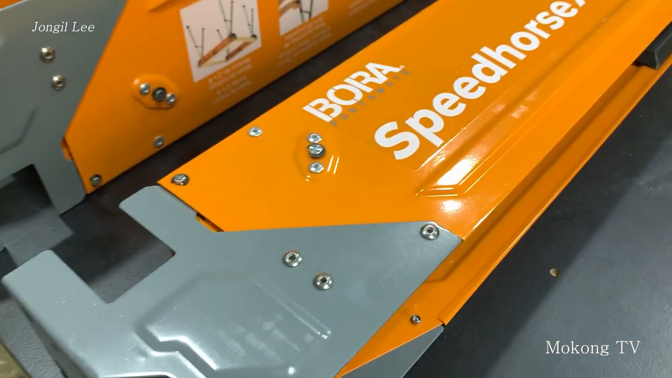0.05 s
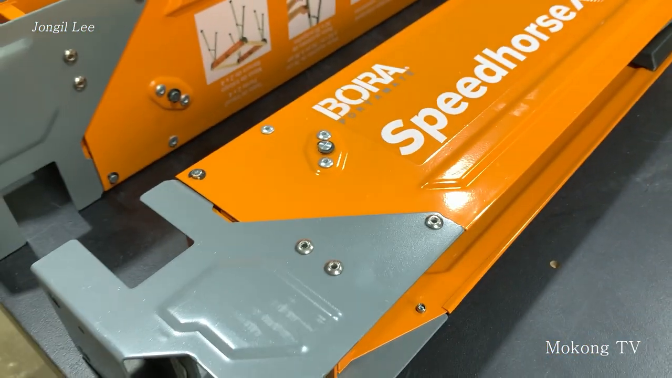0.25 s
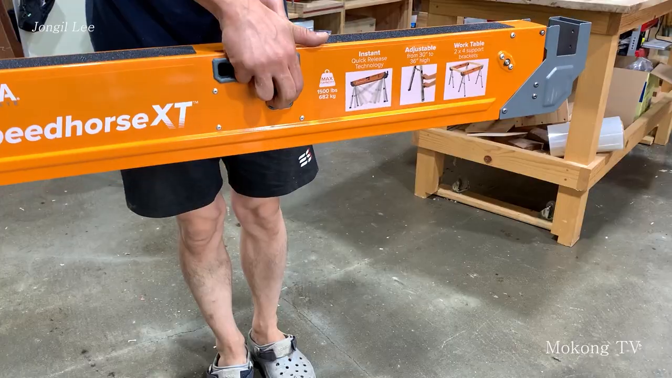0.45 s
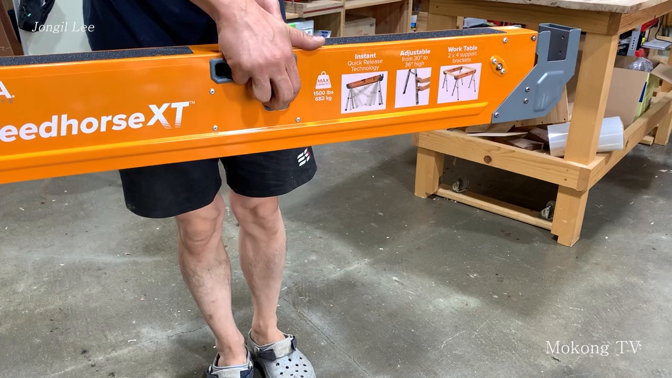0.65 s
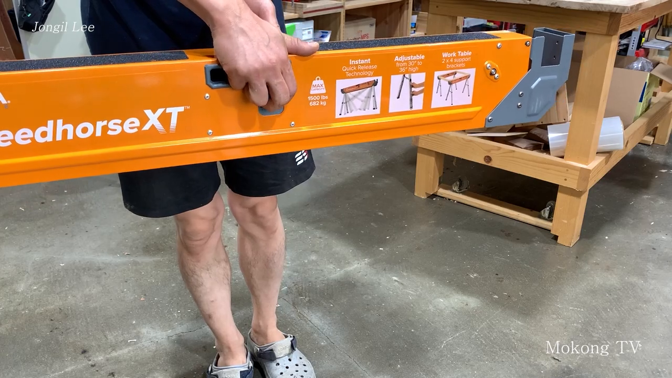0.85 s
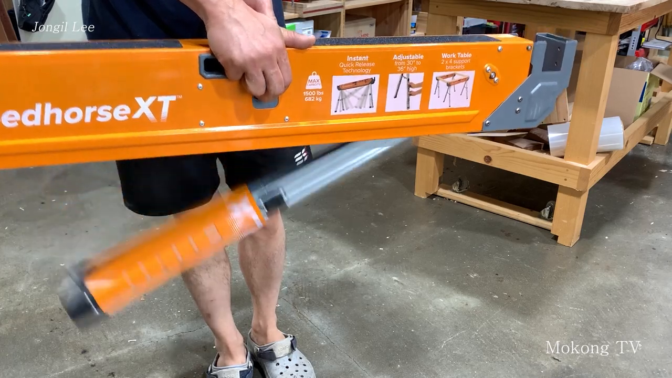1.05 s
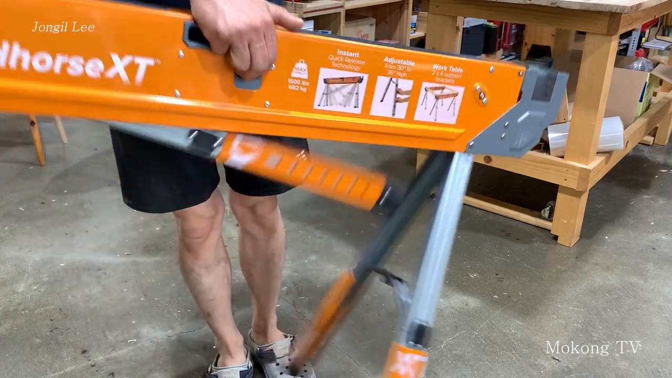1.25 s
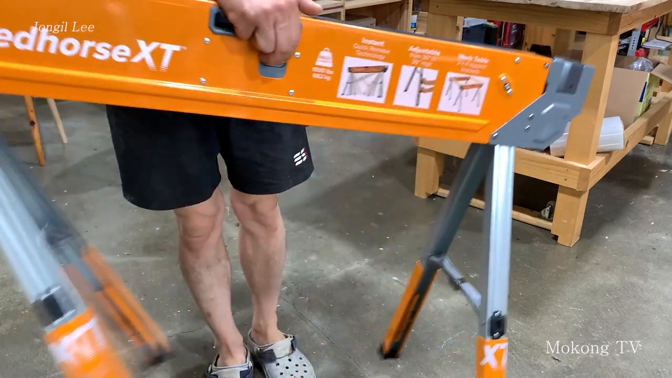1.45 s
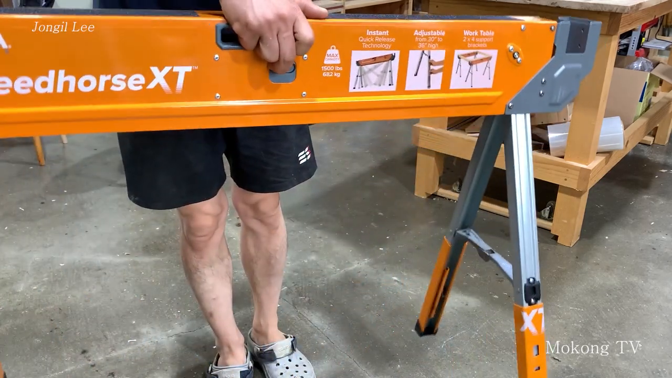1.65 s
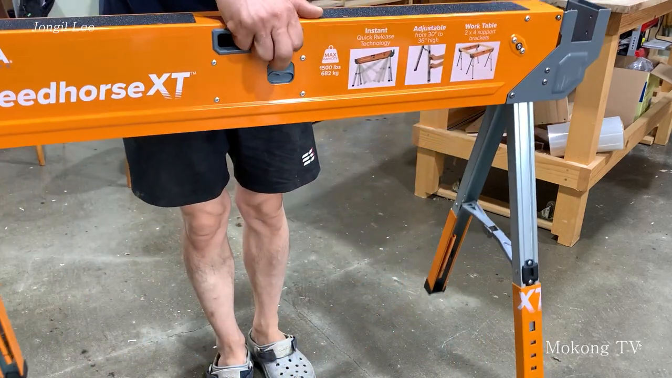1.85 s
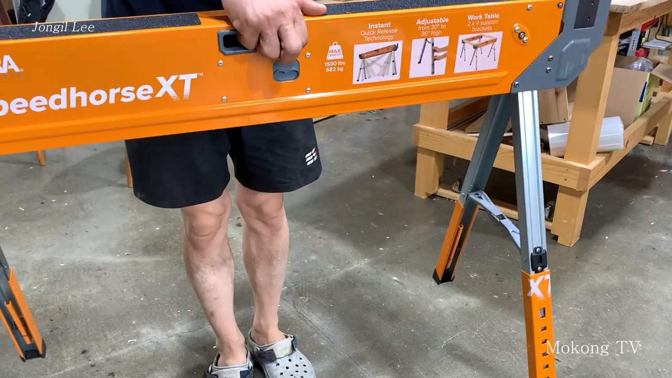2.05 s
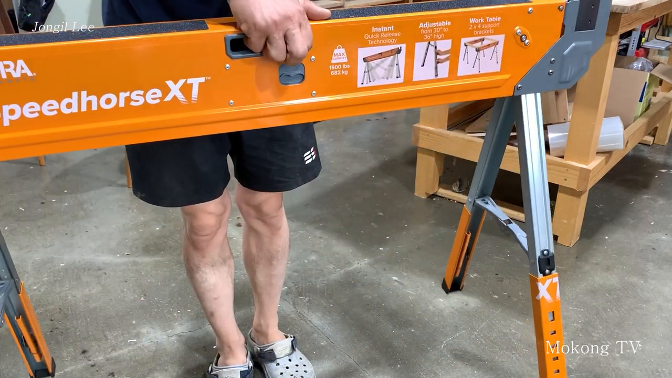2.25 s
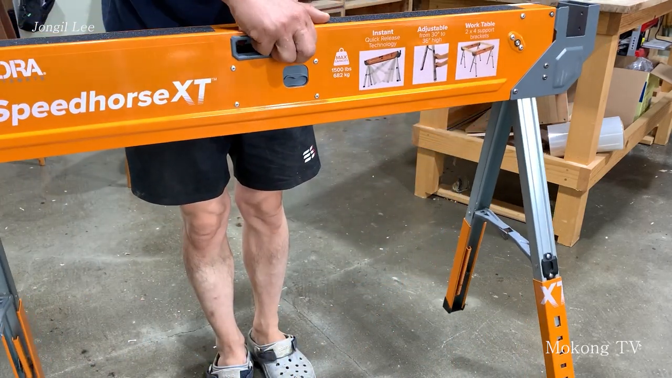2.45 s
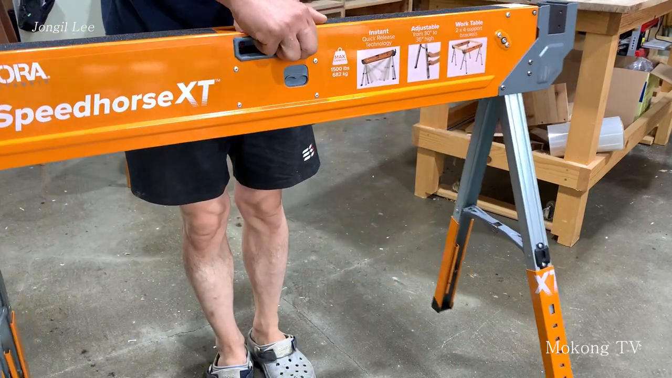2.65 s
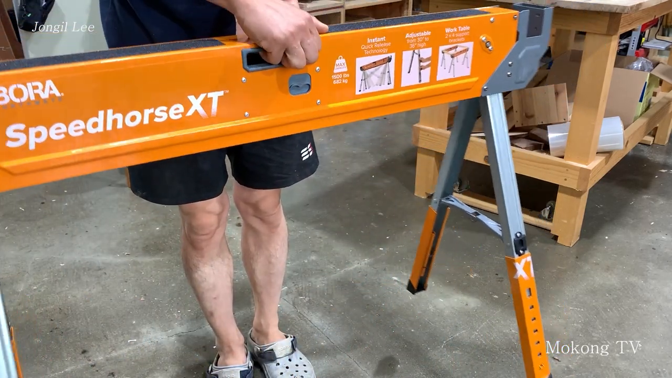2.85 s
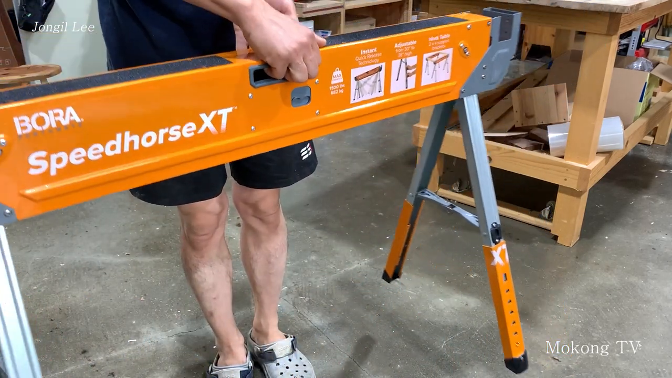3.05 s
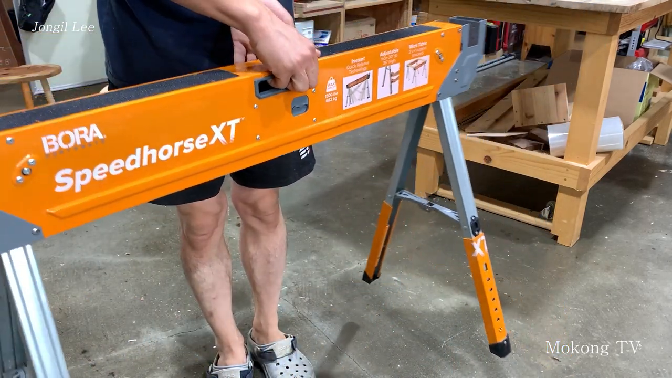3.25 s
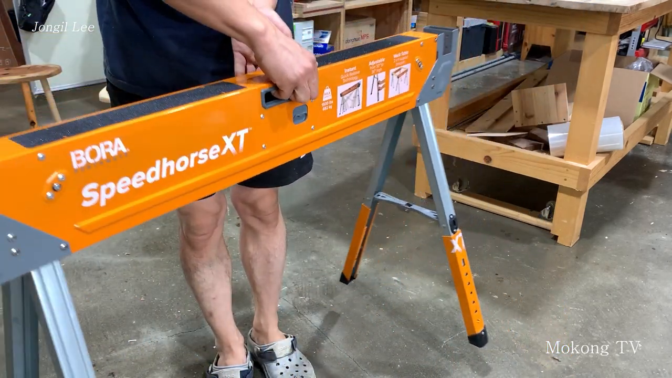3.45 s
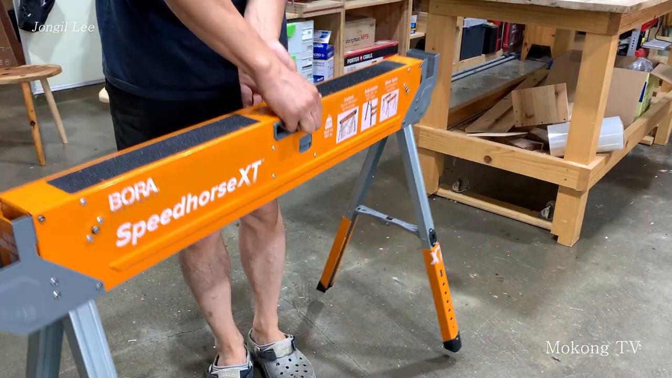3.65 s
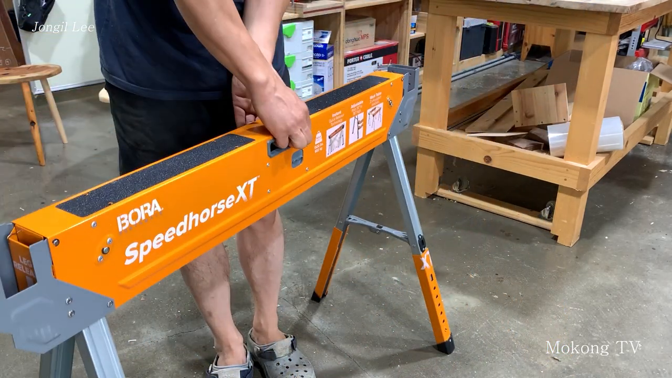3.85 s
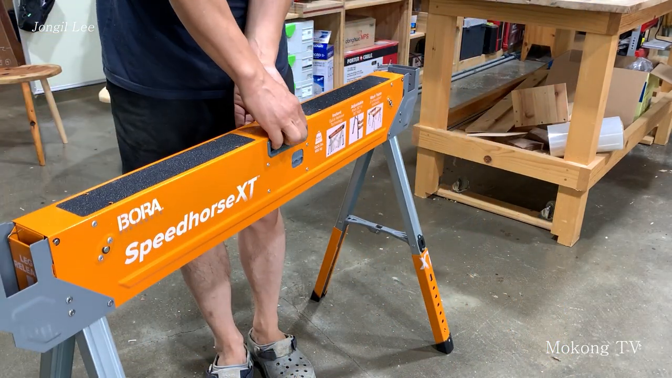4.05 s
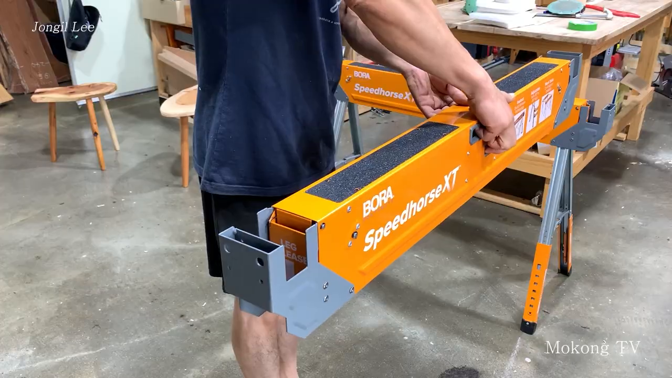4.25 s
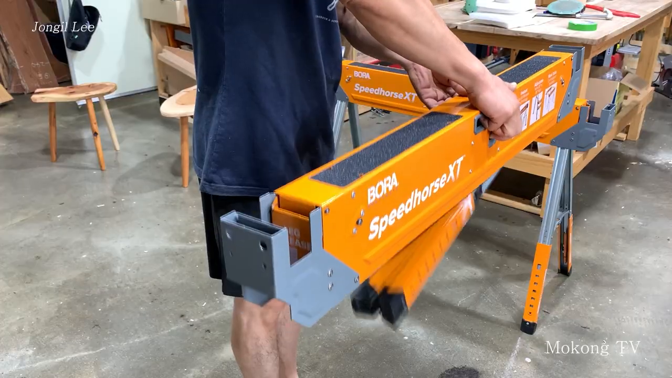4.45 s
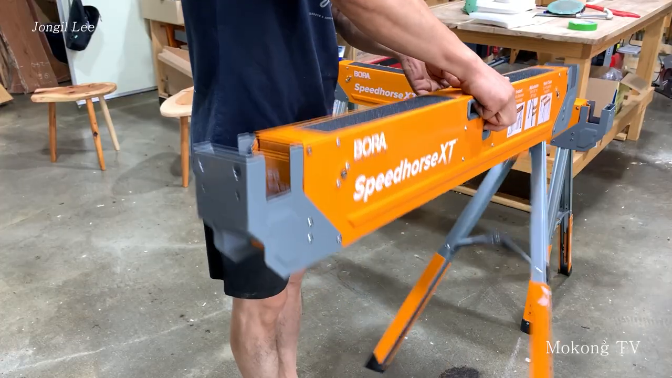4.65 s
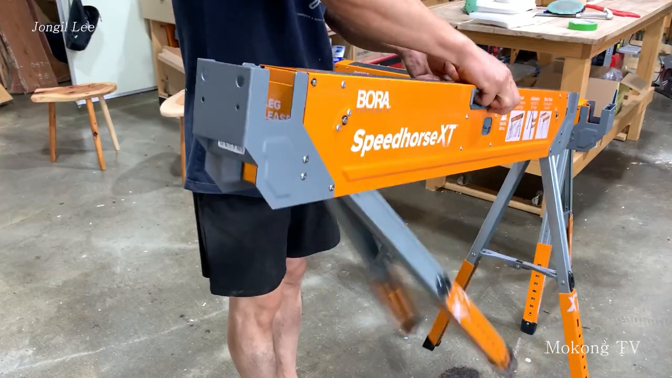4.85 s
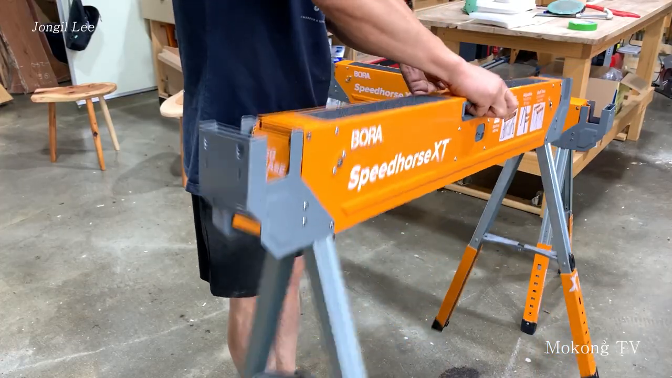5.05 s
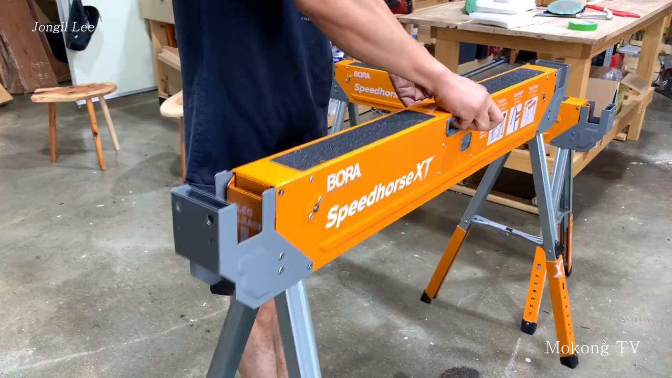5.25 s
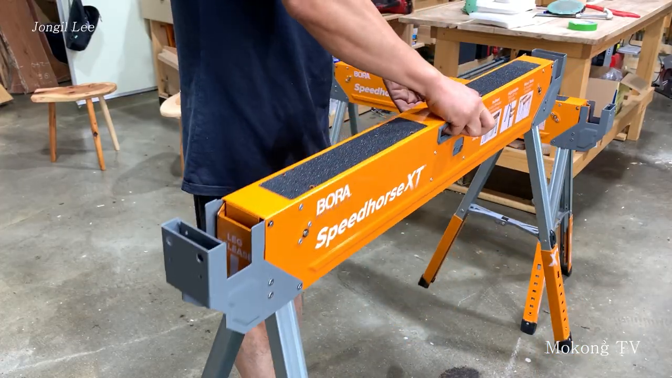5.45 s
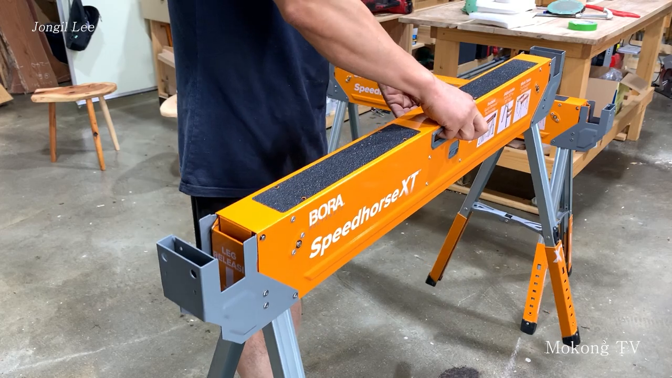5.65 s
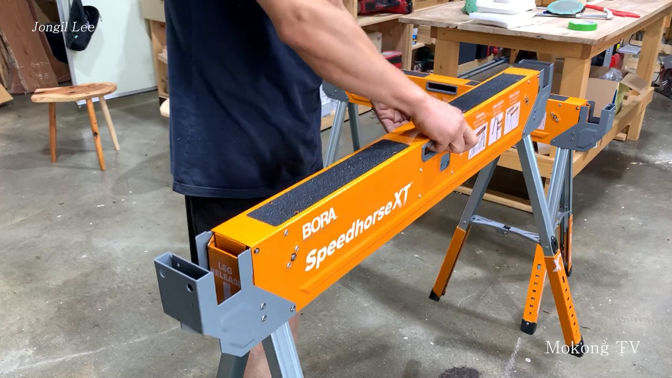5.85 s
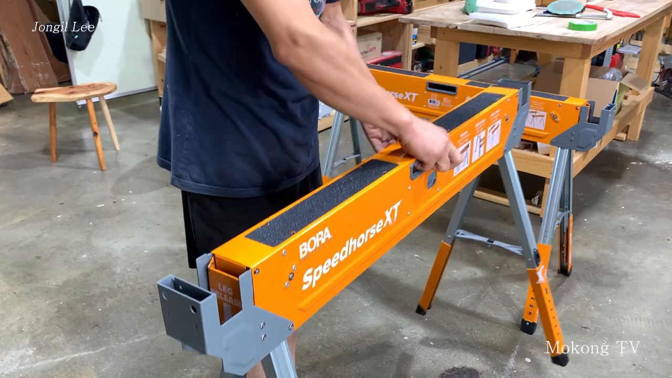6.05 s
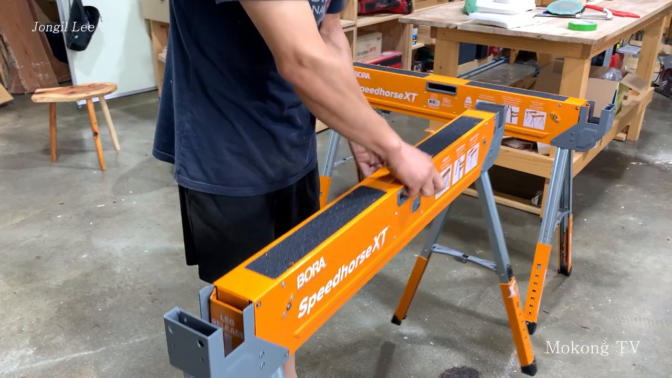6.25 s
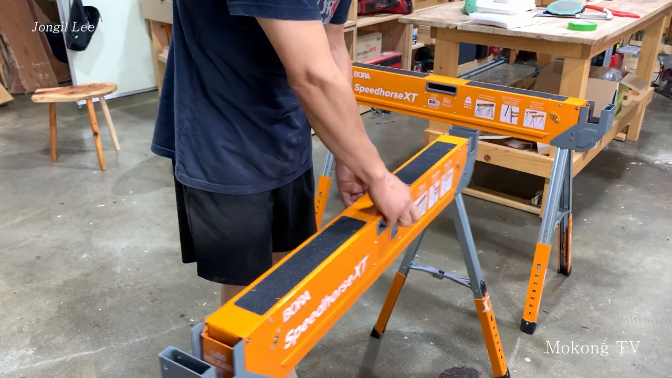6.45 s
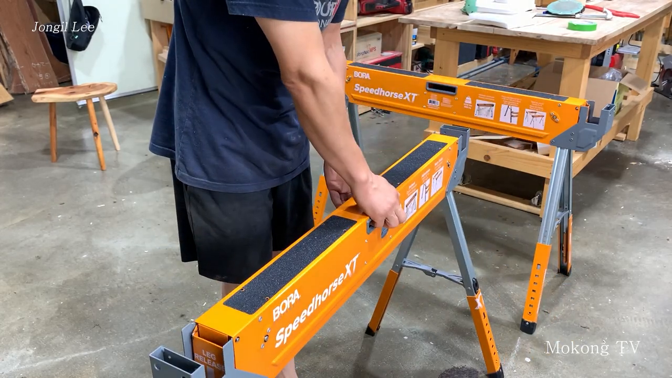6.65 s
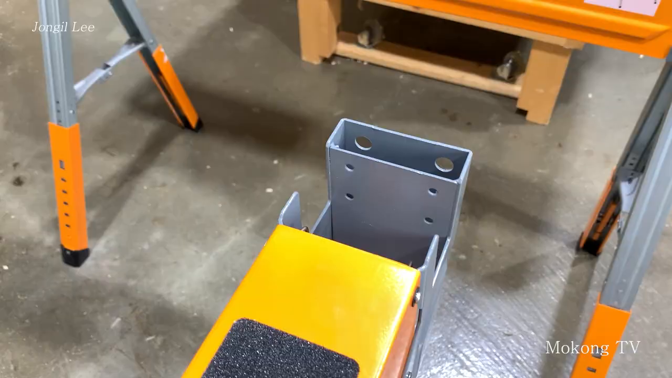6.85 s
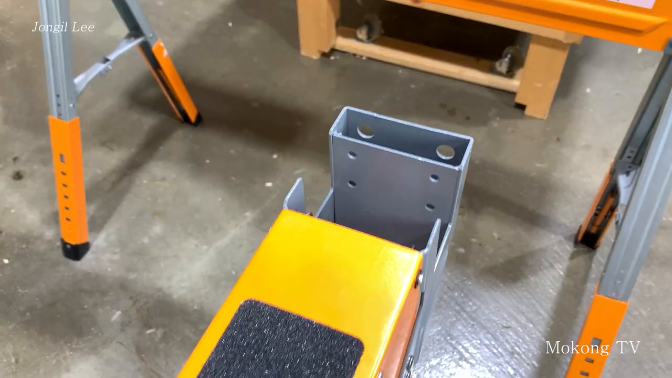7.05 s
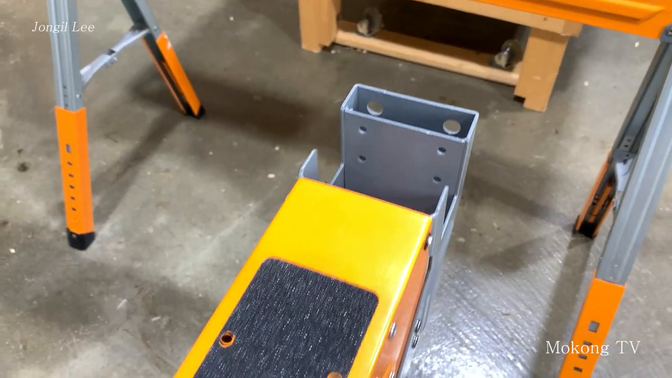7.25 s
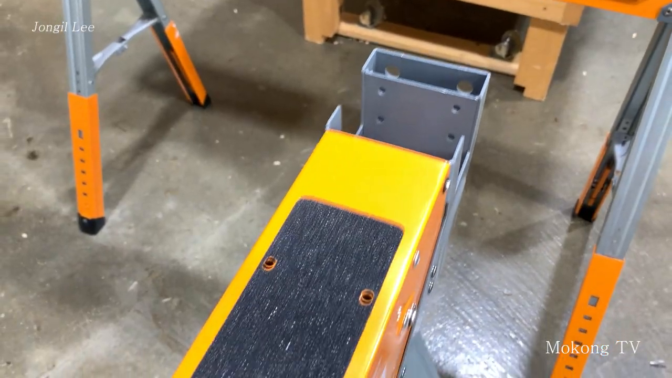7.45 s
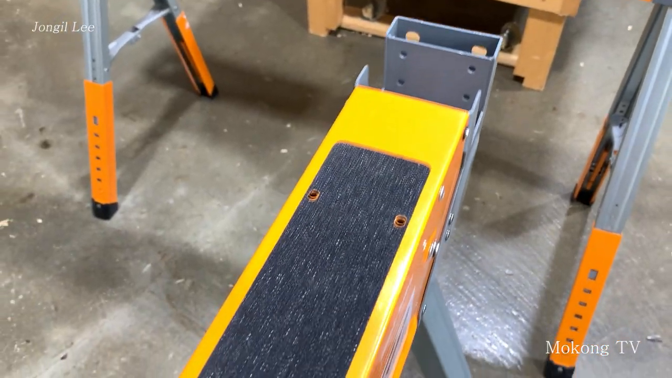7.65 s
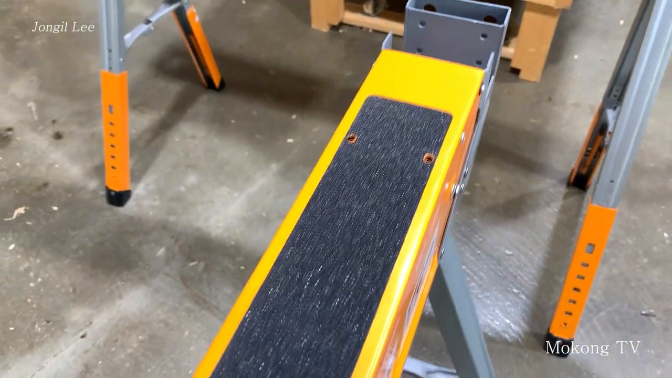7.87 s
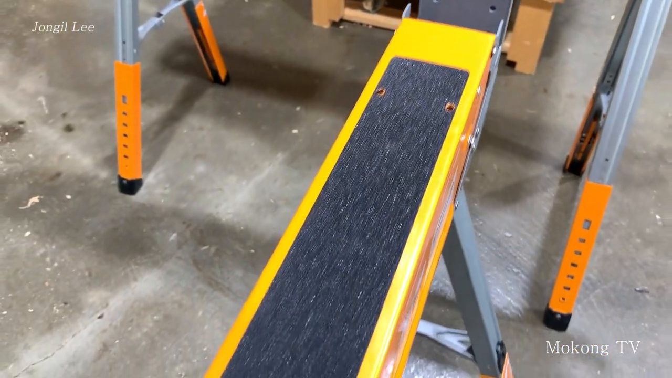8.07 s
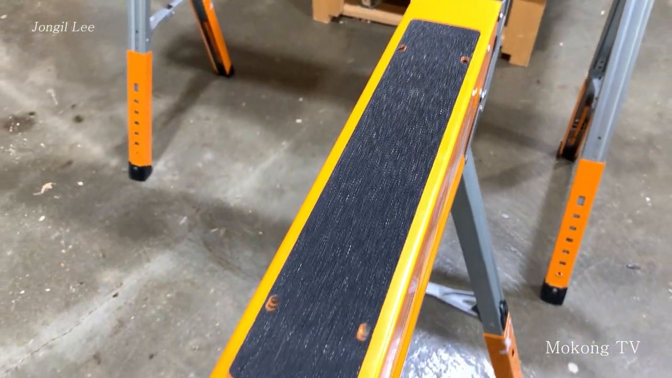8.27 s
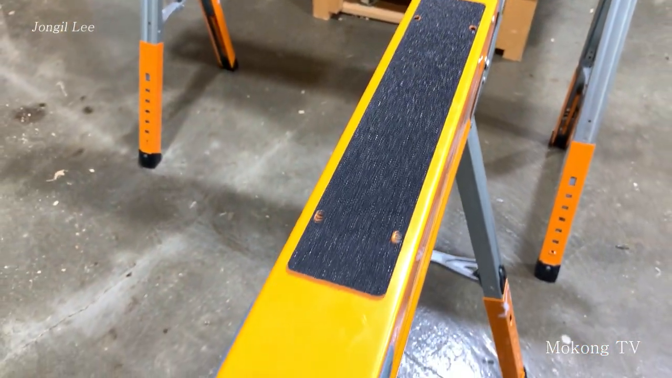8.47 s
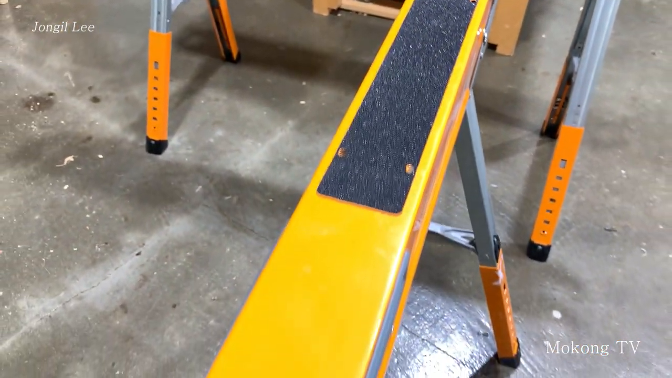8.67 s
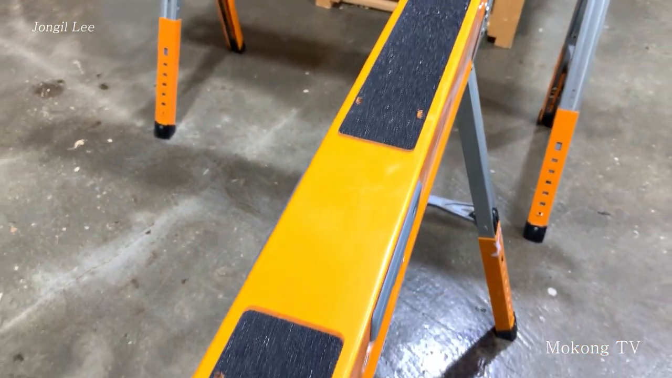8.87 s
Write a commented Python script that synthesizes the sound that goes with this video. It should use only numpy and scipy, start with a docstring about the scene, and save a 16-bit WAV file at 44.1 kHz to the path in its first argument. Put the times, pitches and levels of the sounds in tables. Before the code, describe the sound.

Loud metallic clacks and rattling hinges as folding sawhorse legs swing open twice and the stand is set down on a hard floor, then near quiet.

```python
"""A hard-walled workshop: a steel folding sawhorse is opened and set down, twice over.
Its legs unlatch, swing out, chatter on their hinges and snap into place: noise bursts shaped by panel modes,
with long-ringing sines. The hollow beam knocks, the feet thud, hands and cloth rub: filtered noise.
A motor hums faintly as wavering sines over room noise. One microphone with a fast limiter picks it all up;
splices cut some tails short."""
import sys
import numpy as np
from scipy import signal
from scipy.fft import rfft, irfft, next_fast_len
from scipy.io import wavfile
from scipy.ndimage import uniform_filter1d, minimum_filter1d, map_coordinates

SR = 44100
rng = np.random.default_rng(int(sys.argv[2]) if len(sys.argv) > 2 else 0)


def transcribe(signal):
    """Save signal, clipped to [-1, 1], as a 16-bit WAV file at the path in sys.argv[1]."""
    frames = np.atleast_2d(signal).T
    limited = np.clip(frames, -1, 1)
    pcm = np.round(limited * 32767).astype(np.int16)
    wavfile.write(sys.argv[1], SR, pcm)


N = 392931
AGE = np.arange(SR) / SR  # time since a blow, s
CLOCK = np.arange(N) / SR  # time in the scene, s
MODE_COUNT = 520
SHEET = rng.standard_normal(MODE_COUNT)  # chance strengths of the dense modes, alike for every blow
# Splices, where struck sounds are cut off and the background may change: t/s
SPLICE_TIMES = [.37, 4.214, 6.897]


def amp(db):
    """The decibel law: level to amplitude gain."""
    return 10 ** (np.asarray(db) / 20)


def unit(x):
    """Normalisation by mean power: scale to rms 1."""
    return x / np.sqrt(np.mean(x ** 2) + 1e-20)


def along(points, hz):
    """Interpolation of (f/Hz, value) points on a logarithmic frequency axis."""
    f, values = np.transpose(points)
    return np.interp(np.log(hz + 1), np.log(f), values)


def noise(gain, size):
    """Spectral filtering: white noise coloured by a function of frequency, at rms 1."""
    m = next_fast_len(size)
    spectrum = rfft(rng.standard_normal(m)) * gain(np.fft.rfftfreq(m, 1 / SR))
    return unit(irfft(spectrum, m)[:size])


def fade(t, t60):
    """Exponential decay: 60 dB lost in t60 seconds."""
    return amp(-60 * t / t60)


def wobble(rate):
    """Slow random modulation: a smooth curve through rate random knots a second."""
    knots = rng.standard_normal(int(N * rate / SR) + 4)
    return map_coordinates(knots, [CLOCK * rate], order=2)


def add(track, s, sound):
    """Superposition: lay a sound in at time s, ending at the next splice."""
    start = round(s * SR)
    cuts = [round(c * SR) for c in SPLICE_TIMES if c > s]
    stop = min(cuts + [N, start + len(sound)])
    track[start:stop] += sound[:stop - start]


def ripple(strengths, hz):
    """Modal density: mode strengths spread evenly over all frequencies."""
    return np.interp(hz, np.linspace(0, SR / 2, len(strengths)), strengths)


def burst(colour, envelope, wet_db, build_s=0.0017, lead=0):
    """Direct sound and reverberation: dense modes sound, then the room's answer builds up and decays."""
    # Reverberation time: f/Hz, t60/s
    room_decay = [(100, 0.99), (300, 0.61), (700, 0.56), (1800, 1.0), (4800, 0.98), (8000, 0.75),
                  (14000, 0.5)]
    # Strength of the room's answer: f/Hz, relative level/dB
    wall_strength = [(700, 2.5), (2500, -2.5), (6000, -0.5), (14000, -1.5)]
    spot = rng.standard_normal(MODE_COUNT // 3)  # each struck spot wakes the modes differently
    gain = lambda hz: colour(hz) * amp(1.3 * ripple(SHEET, hz) + 2.5 * ripple(spot, hz))

    # Each pitch dies at its own speed
    hz, t, z = signal.stft(noise(gain, SR), SR, nperseg=256)
    z = z * amp(along(wall_strength, hz))[:, None] * fade(t, along(room_decay, hz)[:, None])
    tail = signal.istft(z, SR, nperseg=256)[1][:SR] * (1 - np.exp(-(AGE / build_s) ** 2))

    # The room's energy follows the direct sound's; lead counts samples before the strike
    wet_gain = amp(wet_db) * np.linalg.norm(envelope) / np.linalg.norm(tail)
    sound = wet_gain * np.pad(tail, (lead, 0))
    sound[:len(envelope)] += noise(gain, len(envelope)) * envelope
    return sound


def background(air_db=-54.5, opening_db=-6, hiss_db=-83, later_db=-3):
    """Harmonic and broadband noise: after the first splice a motor hum joins louder air; it eases after the second."""
    # Motor hum partials: f/Hz, rms level before wavering and easing/dB
    hum_partials = [(59.2, -70.5), (177.6, -70.5), (236.9, -58), (296.1, -77)]
    # Workshop background spectrum: f/Hz, relative level per Hz/dB
    air_spectrum = [(13, -51.5), (22, -28.5), (52, -3.5), (89, 1), (139, -9), (173, -10), (210, -16),
                    (241, 0.5), (268, -15.5), (742, -15.5), (829, -21.5), (1560, -27), (4000, -33.5),
                    (5000, -40), (8000, -51), (15700, -72)]
    running = np.clip((CLOCK - SPLICE_TIMES[0]) / 0.018, 0, 1)
    hum = np.zeros(N)
    for hz, db in hum_partials:
        level = amp(db + 0.73 * wobble(43)) * np.sqrt(2)  # rms to peak
        hum += level * np.sin(2 * np.pi * hz * CLOCK + 0.29 * wobble(3.1))
    easing = amp(later_db * np.clip(CLOCK - SPLICE_TIMES[1], 0, 1))  # over one second
    air = noise(lambda hz: amp(along(air_spectrum, hz)), N) * amp(air_db + opening_db * (1 - running))
    hiss = amp(hiss_db) * noise(lambda hz: 1 / (1 + (hz / 12000) ** 12), N)  # the microphone's own
    return hum * running * easing + air + hiss


def rub(swells, rest_db, spectrum, uneven_db=1.6):
    """Friction noise: its level rises and falls in a bell with each movement."""
    level = amp(rest_db)  # between the swells
    for s, db, half_s in swells:
        level = level + amp(db) * np.exp(-((CLOCK - s) / half_s) ** 2)
    return level * amp(uneven_db * wobble(30)) * noise(lambda hz: amp(along(spectrum, hz)), N)


def handling():
    """Sliding friction: hands rustle softly and dully, and cloth brushes brightly along the beam."""
    # Swells of the hands, then of the cloth: peak t/s, level/dB, half length/s
    hand_swells = [(.1, -67, .075), (.22, -69.5, 0.19), (7.45, -71, 0.42), (8.45, -67.5, 0.19),
                   (8.8, -72.5, .2)]
    cloth_swells = [(.25, -82, 0.23), (2.75, -69, 0.041), (2.82, -58.5, 0.14), (3.22, -71.5, 0.063),
                    (6.37, -74.5, .1), (8.15, -77, .12), (8.72, -75, .15)]
    # Spectra of the hands, then of the cloth: f/Hz, relative level per Hz/dB
    hand_spectrum = [(300, -18), (850, -11), (1130, 4), (1500, -1.5), (4000, -14.5), (8000, -34),
                     (15000, -46.5)]
    cloth_spectrum = [(500, -18.5), (1500, -4), (4000, 1), (7500, -1), (9300, -9.5), (11800, -3),
                      (14000, -17)]
    return rub(hand_swells, -82, hand_spectrum) + rub(cloth_swells, -90, cloth_spectrum)


def thuds(t60=0.17, wet_db=-2, gain_db=5):
    """Impulsive excitation: a jolt shakes the whole frame at its low, broad resonances."""
    # Jolts of the whole weight, at a leg's stop or on the floor: t/s, relative level/dB
    jolts = [(1.123, -24.5), (1.337, -28.5), (1.786, -46), (3.789, -25), (3.83, -29.5), (4.799, -31),
             (6.465, -19.5), (6.491, -24), (6.535, -28)]
    # Frame resonances: f/Hz, width/octaves, relative level/dB
    frame_modes = [(99, 0.27, -5.5), (176, 0.34, -7), (425, 0.19, 3.5)]
    track, t = np.zeros(N), AGE[:SR // 2]
    push = fade(t, t60) * (1 - np.exp(-t / 0.013))

    def frame_gain(hz):
        """Resonance: broad peaks, each symmetrical in octaves."""
        return sum(amp(db) / (1 + (np.log2((hz + 1) / centre) / octaves) ** 4)
                   for centre, octaves, db in frame_modes)

    for s, db in jolts:
        add(track, s, burst(frame_gain, amp(db + gain_db) * push, wet_db))
    return track


def beam_gain(hz, lowest_hz=130, highest_hz=2000):
    """Damped resonance: the hollow beam's low modes, radiating little below or above them."""
    # Beam modes: f/Hz, width/Hz, relative level/dB
    beam_modes = [(252, 43, -16), (387, 190, -8.5), (467, 16, 1), (515, 90, -2.5), (716, 60, 0),
                  (736, 76, -6.5)]
    power = sum(np.abs(amp(db) * hz * w / (c * c - hz * hz + 1j * hz * w)) ** 2 for c, w, db in beam_modes)
    return np.sqrt(power) * hz ** 2 / (hz ** 2 + lowest_hz ** 2) / (1 + (hz / highest_hz) ** 2)


def panel_gain(hz, treble_db, focus_hz, focus_db=4, focus_octaves=0.66):
    """Contact stiffness: hard contacts are brighter, and the struck spot favours one region."""
    # Broad colour of the thin steel panels: f/Hz, relative level per Hz/dB
    panel_colour = [(470, -27.5), (760, 0), (941, -6.5), (1570, -4), (1960, -4.5), (2420, -3), (2640, -1),
                    (2890, -3.5), (12200, -12), (15700, -16)]
    # Resonances standing out of the dense modes: f/Hz, width/Hz, prominence/dB
    panel_modes = [(1093, 15, 7.5), (1510, 17, -0.5), (1896, 16, 6), (2665, 16, 3), (3220, 180, 3.5),
                   (3652, 60, 3.5), (4030, 67, 2), (4680, 90, 2.5), (5370, 57, 5), (8500, 80, 1.5),
                   (8932, 30, 2), (9700, 20, 3), (11292, 110, 6)]
    octaves = np.log2((hz + 1) / focus_hz)
    hardness = along([(3000, 0.21), (10000, 0.97)], hz) * (treble_db + 12)
    modes = sum(db / (1 + (2 * (hz - c) / w) ** 2) for c, w, db in panel_modes)
    focus = focus_db * np.exp(-(octaves / focus_octaves) ** 2)
    return amp(along(panel_colour, hz) + modes + hardness + focus)


def chatter(rate=450, wet_db=-1, treble_db=-12, beam_db=-9):
    """Repeated impact: a leg shudders against its stop, and a swarm of tiny contacts swells and dies away."""
    # Loose hinges chattering: t/s, relative level/dB, time to the peak/s
    shudders = [(1.365, -12.5, 0.032), (1.625, -17.5, 0.031), (4.825, -11, 0.038), (5.17, -19, 0.016)]
    track, t = np.zeros(N), AGE[:SR // 2]
    for s, db, peak_s in shudders:
        contacts = (rng.random(len(t)) < rate / SR) * rng.exponential(size=len(t))  # rate per second
        energy = signal.fftconvolve(contacts, fade(t, 0.09))[:len(t)]  # their energies add
        swarm = unit(np.sqrt(np.abs(energy)))
        envelope = amp(db - 5) * swarm * t / peak_s * np.exp(1 - t / peak_s)
        colour = lambda hz: panel_gain(hz, treble_db, focus_hz=2070)
        add(track, s, burst(colour, envelope, wet_db, 2 * peak_s))
        add(track, s, burst(beam_gain, amp(beam_db) * envelope, wet_db, 2 * peak_s))
    return track


def ringing(ring_db, focus_hz, focus_db, focus_octaves=.3):
    """Free vibration: long steel modes at new strengths each blow, most near the favoured resonance."""
    # Long ring of the legs: f/Hz, relative level/dB, t60/s
    leg_modes = [(1100, -2, 0.84), (1980, -2, .75), (2740, -1, 0.5), (2821, -2.5, .8), (3340, -3.5, .7),
                 (4800, -2, 0.65), (5033, -3, 0.6), (8350, -6, .5)]
    t = AGE[:SR * 3 // 4]
    ring = np.zeros(len(t))
    for hz, db, t60 in leg_modes:
        favour_db = focus_db * np.exp(-(np.log2(hz / focus_hz) / focus_octaves) ** 2)
        level = amp(db + favour_db + rng.normal(0, 2.7))
        detune = rng.normal(1, 0.0024)
        ring += level * fade(t, t60) * np.sin(2 * np.pi * hz * detune * t)
    return amp(ring_db) * ring


def blows(clack_db=-7.5, knock_gain_db=-4.0, buzz_s=0.0077, knock_t60=0.12):
    """Impact excitation: each contact buzzes briefly in the panels, and the beam answers with a slower knock."""
    # Steel striking steel as the hand finds the release, the legs drop, spread and lock, and the horse is
    # set down; then again with the second pair, and a last light touch: t/s, relative level/dB, contact
    strikes = [(0.451, -48, "hand"), (0.751, -39, "release"), (0.894, -5.5, "latch"), (0.9096, -13, "stop"),
               (1.065, -11, "hinge"), (1.082, -16, "stop"), (1.1274, -5.5, "hinge"), (1.1424, -6.5, "stop"),
               (1.1863, -13, "hinge"), (1.2073, -5.5, "hinge"), (1.24, -7, "brace"), (1.257, -4, "brace"),
               (1.325, -5.5, "hinge"), (1.339, -2.5, "hinge"), (1.3571, -9, "brace"),
               (1.3794, -6.5, "panel"), (1.5, -5, "latch"), (1.5166, -5.5, "brace"), (1.6169, -5, "hinge"),
               (1.6356, -3.5, "brace"), (1.7811, -5.5, "latch"), (3.757, -40.5, "foot"),
               (3.7786, -5, "foot"), (3.8208, -8, "hinge"), (3.8318, -7, "lock"), (3.8484, -9.5, "hinge"),
               (3.8728, -9.5, "foot"), (4.311, -35, "release"), (4.3422, -2, "panel"),
               (4.3839, -13.5, "stop"), (4.527, -19, "latch"), (4.546, -3.5, "latch"),
               (4.5907, -9.5, "stop"), (4.6264, -16, "brace"), (4.656, -12, "stop"), (4.7113, -8, "hinge"),
               (4.7236, -4.5, "hinge"), (4.7931, -7.5, "brace"), (4.808, -4.5, "panel"),
               (4.8281, -3, "panel"), (5.008, -5.5, "brace"), (5.1209, -3, "brace"), (5.1378, -1, "brace"),
               (5.152, -14.5, "stop"), (5.172, -8.5, "lock"), (6.429, -39, "panel"), (6.4498, -3.5, "foot"),
               (6.4674, -7.5, "foot"), (6.485, -7.5, "foot"), (6.5106, -7.5, "hinge"), (6.521, -7, "panel"),
               (6.551, -12, "brace"), (8.611, -41.5, "hand"), (8.632, -44, "hand")]
    # What meets in a blow sets its colour, by contact: beam knock, relative level/dB, treble of a firm
    # contact, relative level/dB, favoured resonance f/Hz, its prominence/dB, room level/dB
    contact_colours = {"latch": (-14, -11, 1120, 5, 0.5), "stop": (-7.5, -18.5, 1349, 5.5, 3),
                       "hinge": (-9, -11.5, 2399, 2, -1.5), "brace": (-19, -7.5, 2998, 3, -2.5),
                       "panel": (-18.5, -16, 1901.5, 2.5, 0), "foot": (-12.5, -15.5, 2747.5, 5.5, 3.5),
                       "lock": (-22, 7, 4748.5, 6.5, 3), "hand": (-15, -17, 3601, 5.5, -2.5),
                       "release": (3, -26.5, 1300, 9, 1)}
    firm_db, softening = -15.5, 0.41  # a contact lighter than firm loses treble: dB per dB
    graze_s, graze_db, shake_t60 = 0.0065, -9, .7  # lead (s), level, dying away (s)
    track, t = np.zeros(N), AGE[:SR // 4]
    snap = 1 - np.exp(-t / .0003)
    clack = snap * (np.exp(-(t / buzz_s) ** 2) + amp(-23.5) * fade(t, 0.064))
    knock = fade(t, knock_t60) * (1 - np.exp(-t / 0.0029))
    graze = amp(graze_db) * np.ones(round(graze_s * SR))
    edge_gain = lambda hz: amp(along([(1500, -22.5), (6000, 1.5), (13000, -1.0)], hz))

    for (s, db, contact), (last_s, last_db, _) in zip(strikes, strikes[:1] + strikes):
        knock_db, treble_db, focus_hz, focus_db, room_db = contact_colours[contact]
        treble_db = treble_db + softening * min(db - firm_db, 0)
        # Parts still shaking from the last blow graze before they strike
        shaking = amp(last_db) * fade(s - last_s, shake_t60) * graze
        buzz = amp(clack_db) * np.concatenate([shaking, amp(db) * clack])
        colour = lambda hz: panel_gain(hz, treble_db, focus_hz, focus_db)
        add(track, s - graze_s, burst(colour, buzz, room_db, lead=len(graze)))
        add(track, s, burst(beam_gain, amp(db + knock_db + knock_gain_db) * knock, room_db))
        crack = noise(edge_gain, len(t)) * snap * fade(t, 0.0089)  # the hard edge
        add(track, s, amp(db + clack_db + treble_db + 0.5) * crack)
        add(track, s, amp(db + clack_db) * ringing(-38.0, focus_hz, focus_db))
    return track


def scene():
    """Superposition: all sources sum at one microphone, heard alike in both channels."""
    mono = background() + handling() + thuds() + chatter() + blows()
    return np.tile(mono, (2, 1))


def record(dry, hold_s=0.0006, ceiling=.67, top_hz=15800):
    """Gain limiting and band limiting: a fast limiter flattens the clacks, a low-pass drops the top."""
    span = max(int(hold_s * SR), 8)
    needed = np.minimum(1, ceiling / (np.abs(dry) + 1e-9))
    limited = dry * uniform_filter1d(minimum_filter1d(needed, span), span)
    low_pass = signal.firwin(255, top_hz, window="blackman", fs=SR)
    return signal.fftconvolve(limited, low_pass[None], mode="same", axes=1)


dry = scene()
out = record(dry)
transcribe(out)
```